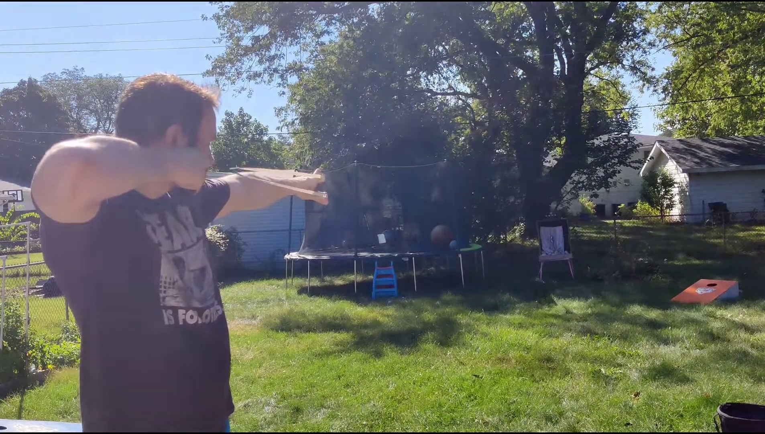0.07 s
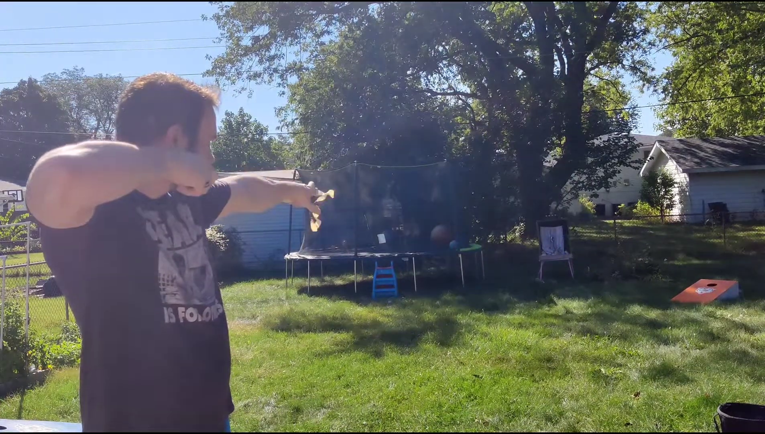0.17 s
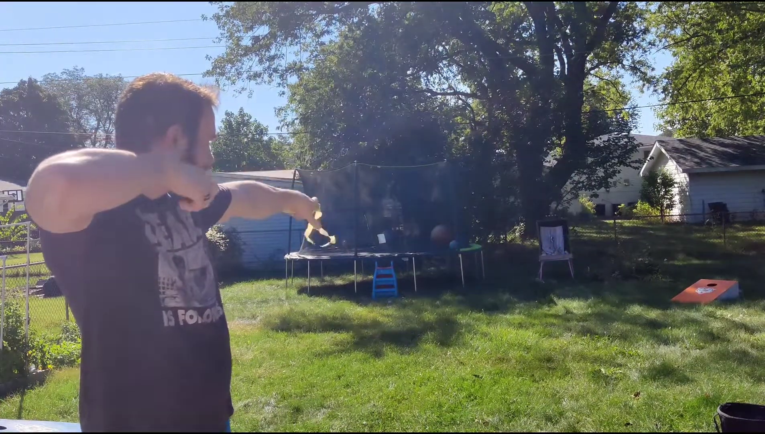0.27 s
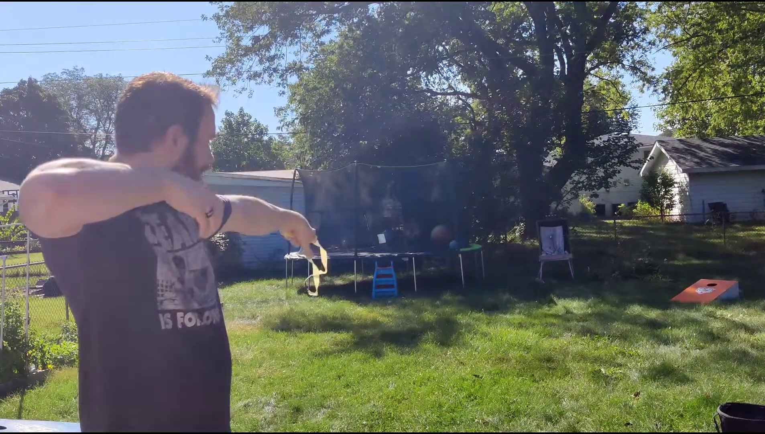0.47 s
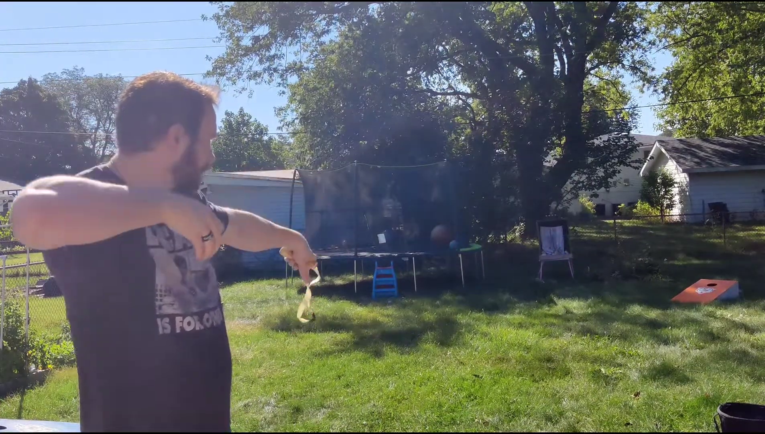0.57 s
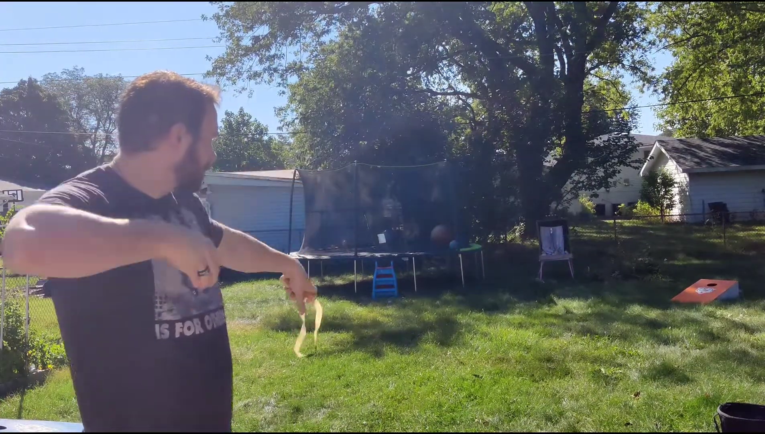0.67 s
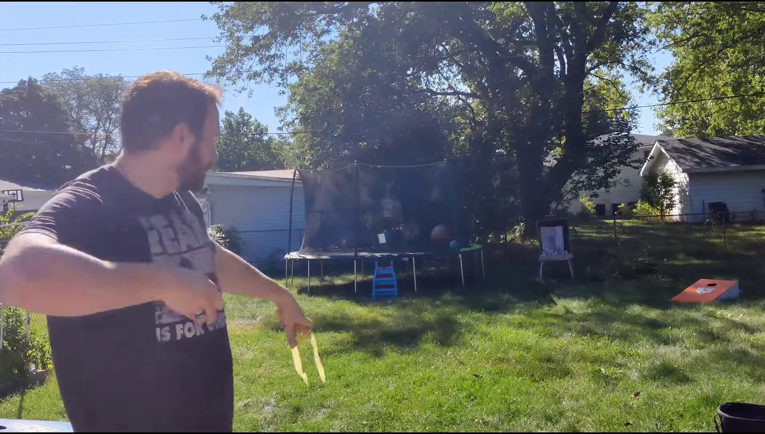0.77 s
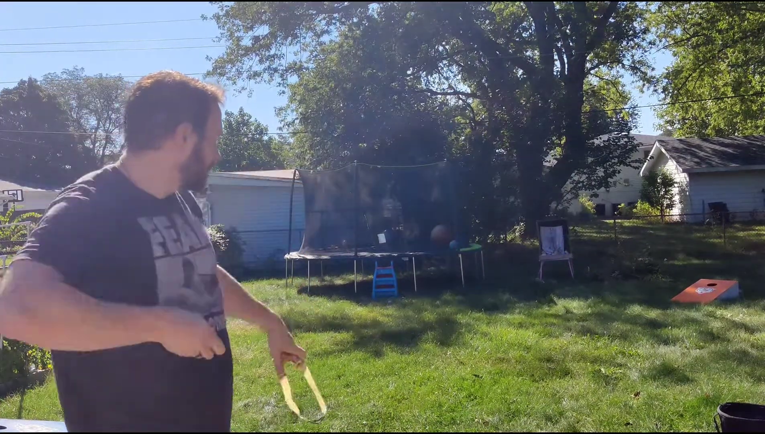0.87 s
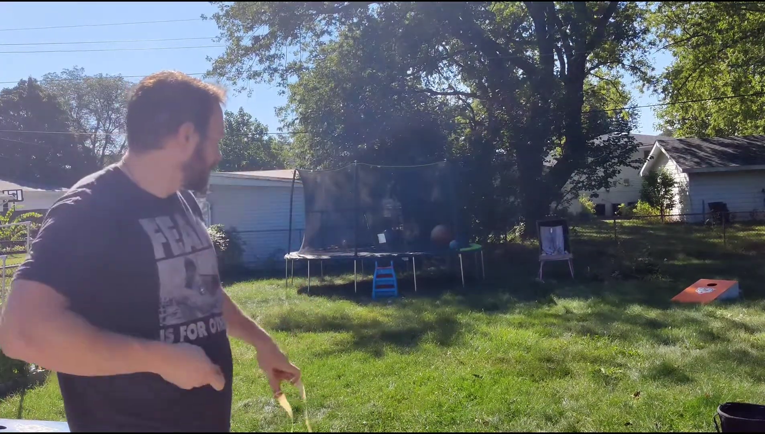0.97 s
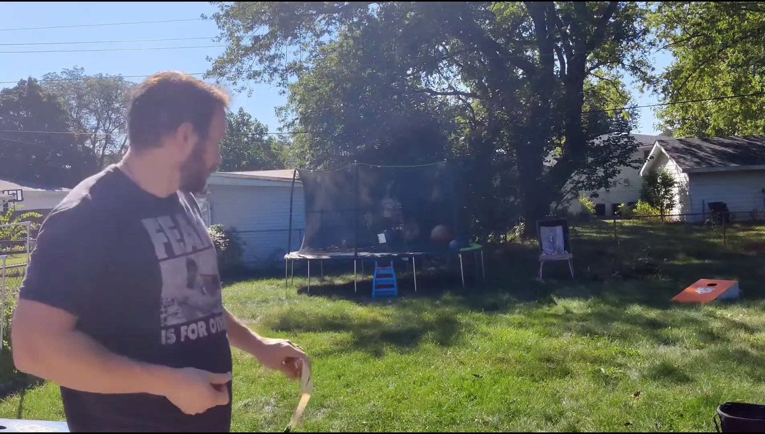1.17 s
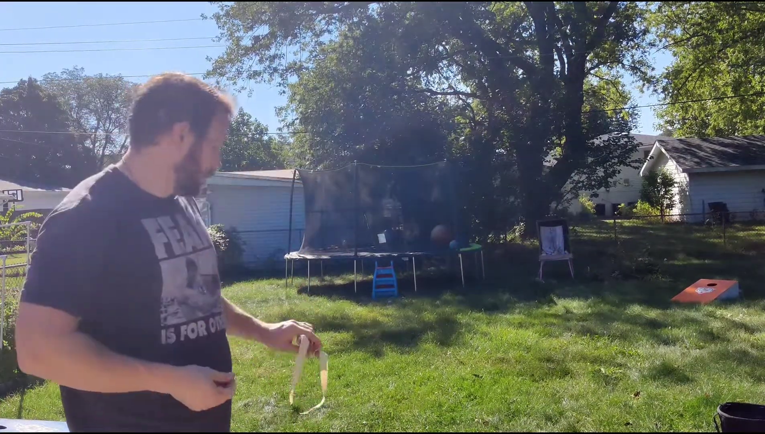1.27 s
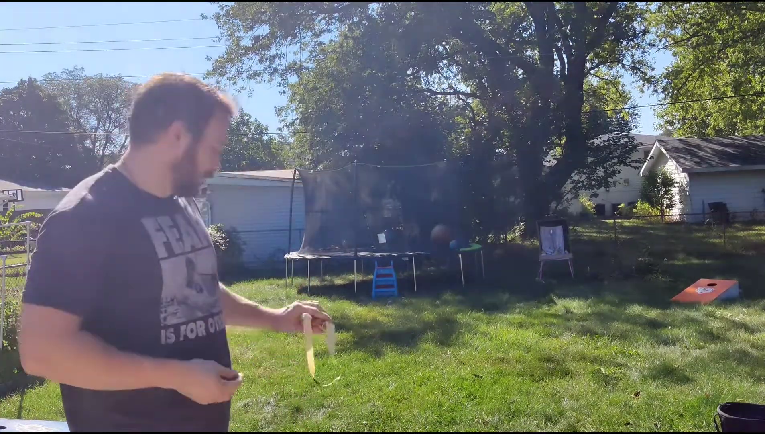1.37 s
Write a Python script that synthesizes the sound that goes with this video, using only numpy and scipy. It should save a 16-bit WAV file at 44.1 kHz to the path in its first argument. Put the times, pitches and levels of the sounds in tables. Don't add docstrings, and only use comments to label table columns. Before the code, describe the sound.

A ball striking a tin can dominates this quiet backyard, heard over faint traffic rumble and leaves. A weak cricket opens; at 0.2 seconds a close slingshot band flaps in quick rubbery slaps with small air puffs. At 0.46 the can cracks sharply with a short tinny ring and low thump. Duller tumbles and echoes follow until about 0.95, then faint cricket chirps and one tiny falling bird whistle near 1.07.

```python
import sys
import numpy as np
from scipy import signal
from scipy.fft import rfft, irfft, next_fast_len
from scipy.io import wavfile
from scipy.ndimage import uniform_filter1d

SR = 44100
rng = np.random.default_rng(int(sys.argv[2]) if len(sys.argv) > 2 else 0)


def waveform_to_disk(signal):
    frames = np.transpose(np.atleast_2d(signal))
    scaled = np.clip(frames, -1, 1) * 32767
    samples = np.round(scaled).astype(np.int16)
    wavfile.write(sys.argv[1], SR, samples)


def convert_level_to_amplitude(level_db):
    exponent = np.asarray(level_db, float) / 20
    return 10 ** exponent


N = 61739

# t/s, level/dB, smear (factor on the ring), dulling corner f/Hz
KNOCKS = [(.459, -6, 0.83, 12000), (.477, -15, 0.65, 3800), (.501, -19, 2.1, 1300), (.529, -27, 2, 2340),
          (.553, -49, 0.46, 2950), (.574, -23, 1.7, 1102), (.600, -45.5, 0.7, 2500),
          (.638, -14.5, 2.27, 795), (.696, -27.5, 2.1, 890), (.714, -30, 1.5, 2600), (.752, -57, 1.5, 2030),
          (.793, -39.5, 1.2, 2380), (.815, -44.5, 1.1, 2070), (.911, -46.5, 0.91, 2400),
          (.931, -37.5, 1.06, 915), (.945, -47.5, 2.3, 2595)]
# f/Hz, level/dB
CRACK = [(700, -33.5), (1300, -35.5), (2200, -4.5), (3500, -17), (5700, -7.5), (7800, -15), (9300, -32.5),
         (15000, -46)]
BLOW_S, BLOW_RISE_S = KNOCKS[0][0], .0008


def band():
    # t/s, level/dB, rise/s, t60/s
    slaps = [
        (0.207, -44.5, 0.009, 0.25),
        (0.2232, -22, 0.0043, .045),
        (0.2297, -28, 0.0019, .04),
        (0.24, -34, 0.0065, .08),
        (0.2483, -26.5, 0.0045, 0.057),
        (.259, -35, 0.0052, .09),
    ]
    # f/Hz, level/dB
    rubber = [(150, -22), (280, -4), (514, -19), (837, -14), (1600, -15.5), (3600, -18.5), (5800, -8),
              (15000, -43)]
    # f/Hz, level/dB, t60/s
    pouch_modes = [
        (267, -30.5, 0.035),
        (814, -32, 0.032),
    ]
    size = 9000
    out = np.zeros((2, N))
    grains = convert_level_to_amplitude(2.5 * evened(uniform_filter1d(rng.standard_normal(N), size=30)))
    for s, db, rise, t60 in slaps:
        pouch = sum(convert_level_to_amplitude(mode_db + 27.5) * ring(hz, rise, mode_t60) for hz, mode_db, mode_t60 in pouch_modes)
        slap = pair(rubber, size) * shape(rise, t60) * grains[round(s * SR):][:size]
        add(out, s, convert_level_to_amplitude(db) * (slap + pouch))
    return out


def puffs():
    # t/s, level/dB, f/Hz, length/s
    flicks = [
        (0.214, -34, 23.15, 0.038),
        (0.263, -29, 55.5, 0.0251),
        (0.289, -28, 37, 0.036),
    ]
    out = np.zeros(N)
    for s, db, hz, length in flicks:
        t = np.arange(0, length, 1 / SR)
        add(out, s, convert_level_to_amplitude(db) * np.sin(np.pi * t / length) * np.sin(2 * np.pi * hz * t))
    return out * convert_level_to_amplitude(np.array([[3.], [-4.]]))


def can_rings():
    # f/Hz, level/dB, t60/s
    modes = [(715, -3, 0.047), (811.4, -9, 0.13), (866.8, -14.5, 0.17), (939, -16, 0.15),
             (1054, -9.5, 0.11), (1179, -5, 0.022), (1255, -5, 0.039), (1346, -28.5, 0.1),
             (1538, -15, 0.058), (2140, -9.5, .03), (2342, -15, 0.097), (2870, -15.5, 0.043),
             (3228, -7, 0.049), (5200, -8, 0.026)]
    spread_db, detune, return_rise_s = 1.5, .018, .0025
    out = np.zeros(N)
    luck = rng.standard_normal((len(KNOCKS), len(modes), 2))
    luck[0] = 0
    for k, (s, db, smear, corner_hz) in enumerate(KNOCKS):
        rise = return_rise_s if k else BLOW_RISE_S
        sound = 0
        for j, (hz, mode_db, t60) in enumerate(modes):
            louder, sharper = luck[k, j]
            sign = -1 if j == 1 and k == 0 else 1
            level = sign * convert_level_to_amplitude(mode_db + spread_db * louder)
            dulling = (1 + (hz / corner_hz) ** 8) ** .5
            sound = sound + level * ring(hz * (1 + detune * sharper), rise, t60 * smear, size=14000) / dulling
        add(out, s, convert_level_to_amplitude(db) * sound)
    return out


def crack():
    out = np.zeros((2, N))
    add(out, BLOW_S, convert_level_to_amplitude(-20) * pair(CRACK, 9000) * shape(BLOW_RISE_S, t60=.024))
    return out


def snap(strength):
    click = np.roll(irfft(convert_level_to_amplitude(read(CRACK, np.fft.rfftfreq(256, 1 / SR)))), 128)
    out = np.zeros(N)
    add(out, BLOW_S, click * strength / np.linalg.norm(click))
    return out


def smack():
    # f/Hz, level/dB, t60/s
    dent_modes = [(260, -36, .05), (1200, -15, .016), (1620, -19, .016), (3450, -19, .014),
                  (5500, -21, .012)]
    return sum(convert_level_to_amplitude(db) * ring(hz, BLOW_RISE_S, t60) for hz, db, t60 in dent_modes)


def can():
    steep = signal.butter(6, 600, "high", fs=SR, output="sos")
    burst = crack()
    tin = signal.sosfilt(steep, can_rings() + burst)
    add(tin, BLOW_S, smack())
    return tin, signal.sosfilt(steep, snap(np.linalg.norm(burst[0])))


def stand():
    # f/Hz, level/dB, rise/s, t60/s
    boom = [
        (56.2, -22.5, 0.015, 0.18),
        (82.9, -33, 0.044, 0.77),
        (137.7, -26.5, 0.043, .14),
    ]
    # t/s, f/Hz, level/dB, rise/s, t60/s
    tumbles = [
        (.635, 55.6, -29.5, 0.037, 0.085),
        (0.678, 141, -43, 0.013, .3),
        (0.742, 51.4, -41, 0.012, 0.078),
    ]
    out = np.zeros(N)
    for hz, db, rise, t60 in boom:
        add(out, BLOW_S, convert_level_to_amplitude(db) * ring(hz, rise, t60, size=20000))
    for s, hz, db, rise, t60 in tumbles:
        add(out, s, convert_level_to_amplitude(db) * ring(hz, rise, t60, size=20000))
    return out * convert_level_to_amplitude(np.array([[1], [-1]]))


def yard(x, same):
    # f/Hz, t60/s
    decay = [(300, 0.23), (800, 0.5), (2000, 1), (5000, 0.82), (10000, 0.62)]
    # f/Hz, level/dB
    colour = [(300, 9.5), (800, 5), (2000, -2.5), (4200, -1), (7000, -5), (8500, -8.5), (10000, -9.5),
              (14000, -5.5)]
    taps = np.zeros((2, SR))
    at = np.arange(300, SR - 20, 20) + rng.integers(0, 20, (2, (SR - 301) // 20))
    np.put_along_axis(taps, at, rng.choice([-1., 1.], at.shape), 1)
    taps[1] = same * taps[0] + np.sqrt(1 - same ** 2) * taps[1]
    hz, t, z = signal.stft(taps, SR, nperseg=256)
    fading_db = read(colour, hz)[:, None] - 60 * t / read(decay, hz)[:, None]
    tail = signal.istft(z * convert_level_to_amplitude(fading_db), SR, nperseg=256)[1]
    return signal.fftconvolve(x[None], tail / np.linalg.norm(tail[0]), axes=1)[:, :N]


def cricket():
    # t/s, level/dB
    strokes = [(.004, -64), (0.018, -61.5), (.038, -72), (0.062, -63), (0.074, -68), (0.096, -69),
               (0.114, -74), (.146, -72), (1.002, -62.5), (1.042, -61), (1.068, -65), (1.089, -60.5),
               (1.114, -65), (1.14, -70.5)]
    pitch_hz, stroke_s = 4550, .022
    out, t = np.zeros(N), np.arange(0, stroke_s, 1 / SR)
    for (s, db), u in zip(strokes, rng.standard_normal(len(strokes))):
        swell = np.sin(np.pi * t / stroke_s) ** 2
        add(out, max(s - stroke_s / 2, 0), convert_level_to_amplitude(db) * swell * np.sin(2 * np.pi * (pitch_hz + 25 * u) * t))
    return out


def bird():
    # t/s, length/s, level/dB, start f/Hz, end f/Hz
    note = (1.065, .05, -66, 4850, 4050)
    s, length, db, from_hz, to_hz = note
    out = np.zeros(N)
    u = np.arange(0, length, 1 / SR) / length
    phase = 2 * np.pi * np.cumsum(from_hz + (to_hz - from_hz) * u) / SR
    add(out, s, convert_level_to_amplitude(db) * np.sin(np.pi * u * np.sqrt(u)) * np.sin(phase))
    return out


def wildlife():
    return (cricket() + bird()) * np.array([[-1.5], [3.5]])


def hum():
    # f/Hz, level/dB per Hz
    colour = [(20, -1.5), (103, -11), (230, -25.5), (900, -30), (1300, -40.5), (5500, -43), (8000, -50),
              (9200, -68)]
    # f/Hz, correlation
    likeness = [(50, .8), (120, .95), (250, .85), (500, .35), (800, 0), (1200, -.35), (2500, -.1),
                (8000, 0)]
    # f/Hz, level/dB
    balance = [(50, 3), (120, 1), (250, 0), (800, 1.5), (2000, 0)]
    level_db, patchy_db = -45.5, 1.2
    frames, hz = N // 256 + 5, np.fft.rfftfreq(1024, 1 / SR)
    a, b, c, d, patches = rng.standard_normal((frames, 513, 5)).T
    patches = uniform_filter1d(patches, size=12, axis=0)
    patches = evened(uniform_filter1d(patches, size=14, axis=1))
    same = np.clip(read(likeness, hz), -1, 1)[:, None]
    left = a + 1j * b
    right = same * left + np.sqrt(1 - same ** 2) * (c + 1j * d)
    tilt = read(balance, hz)[:, None] / 2
    z = np.array([left, right])
    z *= convert_level_to_amplitude(read(colour, hz)[:, None] + patchy_db * patches + np.array([tilt, -tilt]))
    return convert_level_to_amplitude(level_db) * evened(signal.istft(z, nperseg=1024, noverlap=768)[1][:, :N])


def ports(x, lead, balance):
    size = next_fast_len(N + 4096)
    hz = np.fft.rfftfreq(size, 1 / SR)
    half = convert_level_to_amplitude(read(balance, hz) / 2) * np.exp(.5j * read(lead, hz))
    return irfft(rfft(x, size) * np.array([half, 1 / half]), size)[:, :N]


def pair(points, size):
    # f/Hz, unlikeness (0 to 1)
    unlike = [(300, 0), (1500, .5), (5000, .8)]
    apart = read(unlike, np.fft.rfftfreq(size, 1 / SR))
    a, b = rfft(coloured(points, size)), rfft(coloured(points, size))
    return irfft(np.array([a, np.sqrt(1 - apart ** 2) * a + apart * b]), size)


def coloured(points, size):
    spectrum = rfft(rng.standard_normal(size)) * convert_level_to_amplitude(read(points, np.fft.rfftfreq(size, 1 / SR)))
    return evened(irfft(spectrum, size))


def shape(rise, t60, size=9000):
    t = np.arange(size) / SR
    return np.sin(np.pi / 2 * np.minimum(t / rise, 1)) ** 2 * convert_level_to_amplitude(-60 * np.maximum(t - rise, 0) / t60)


def ring(hz, rise, t60, size=9000):
    return shape(rise, t60, size) * np.sin(2 * np.pi * hz * np.arange(size) / SR)


def evened(x):
    return x / np.sqrt(np.mean(x ** 2) + 1e-20)


def read(points, hz):
    f, value = np.transpose(points)
    return np.interp(np.log(hz + 1), np.log(f + 1), value)


def add(mix, s, sound):
    part = mix[..., round(s * SR):][..., :sound.shape[-1]]
    part += sound[..., :part.shape[-1]]


def scene():
    # f/Hz, phase/rad
    can_lead = [(300, 0), (680, -.4), (1000, -1.9), (1570, -.2), (2100, -1), (2800, -2.2), (3300, -1.2),
                (4100, -2.2)]
    band_lead = [(100, 0), (900, 0), (2100, .9), (4200, 1.8), (7500, 2.6)]
    # f/Hz, level/dB
    can_balance = [(450, 0), (700, 8), (870, 7), (1000, -1), (1280, -7), (1570, 8), (2100, -2), (7000, 1)]
    band_balance = [(200, 0), (680, 3), (1000, -1), (2100, 2), (5500, -2), (8500, 4)]
    can_wet_db, wash_db, band_wet_db = -16.5, 1.5, -20.5
    rubber = band()
    tin, click = can()
    near = rubber + yard(convert_level_to_amplitude(band_wet_db) * rubber[0], same=.2)
    far = tin + yard(convert_level_to_amplitude(can_wet_db) * tin.mean(0), same=.7) + yard(convert_level_to_amplitude(wash_db) * click, same=.2)
    directed = ports(near, band_lead, band_balance) + ports(far, can_lead, can_balance)
    return directed + puffs() + stand() + wildlife() + hum()


def band_limit(x):
    return signal.sosfilt(signal.butter(12, 16380, fs=SR, output="sos"), x)


def record(dry):
    knee = .95
    limited = knee * dry / (knee ** 4 + dry ** 4) ** 0.18
    return band_limit(limited)


dry = scene()
out = record(dry)
waveform_to_disk(out)
```